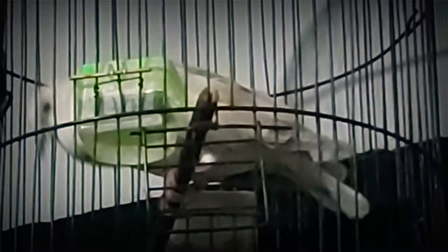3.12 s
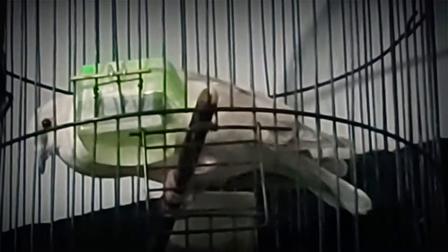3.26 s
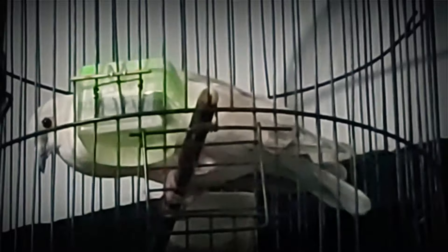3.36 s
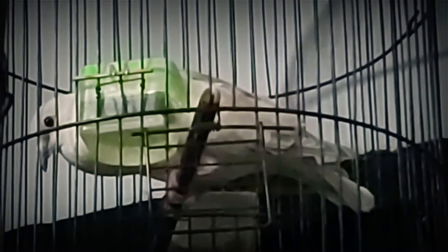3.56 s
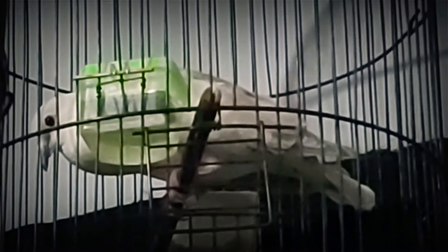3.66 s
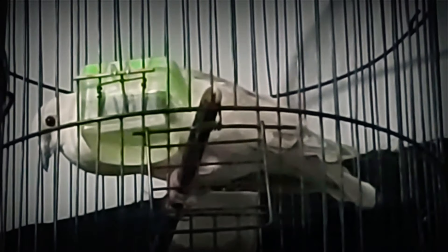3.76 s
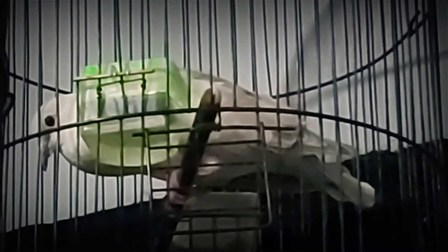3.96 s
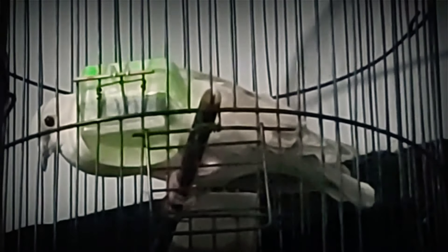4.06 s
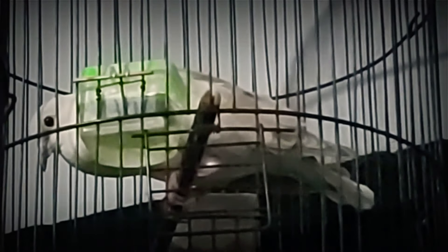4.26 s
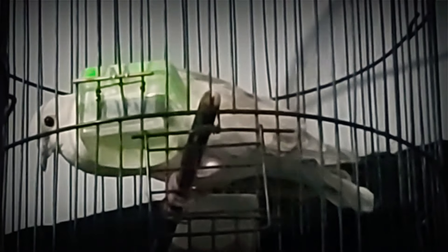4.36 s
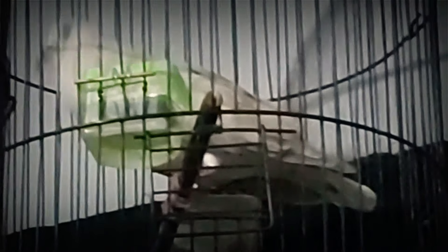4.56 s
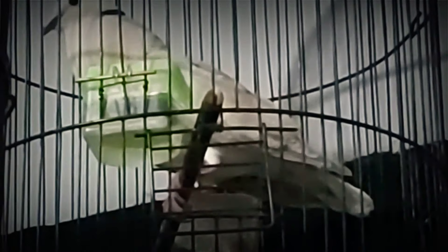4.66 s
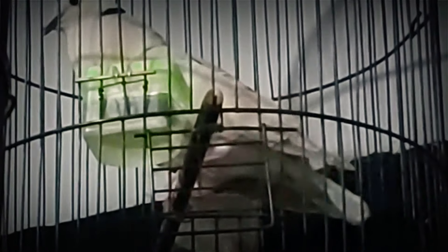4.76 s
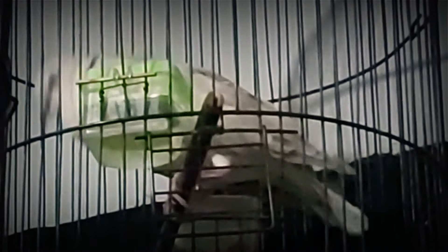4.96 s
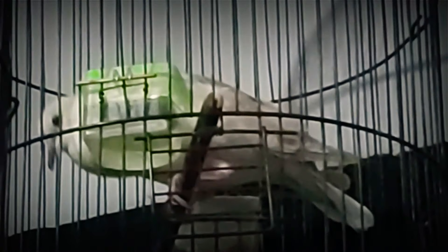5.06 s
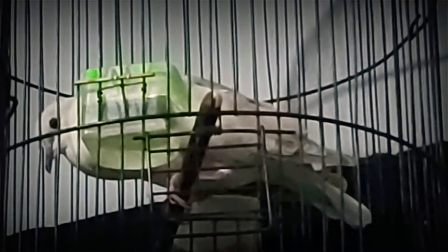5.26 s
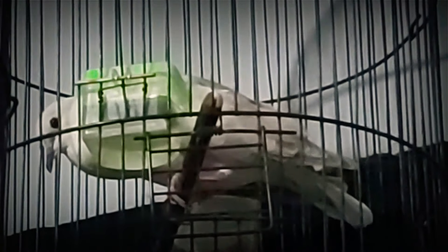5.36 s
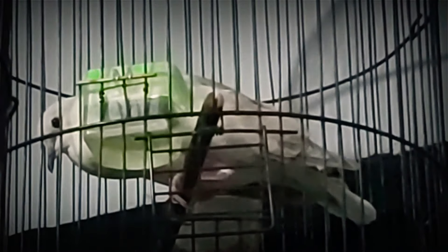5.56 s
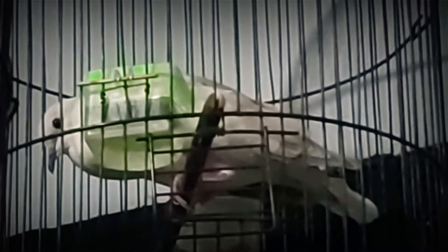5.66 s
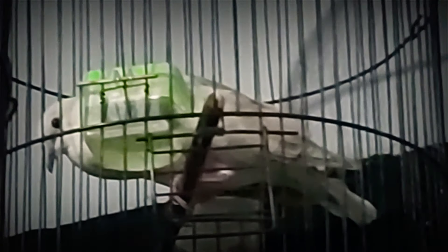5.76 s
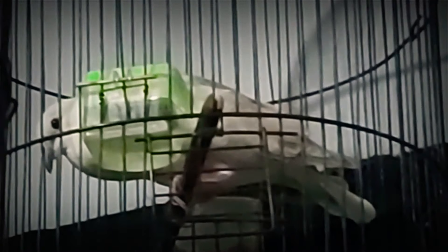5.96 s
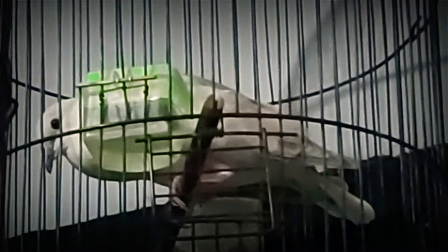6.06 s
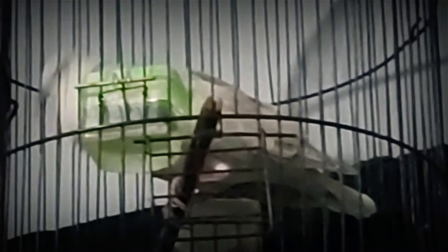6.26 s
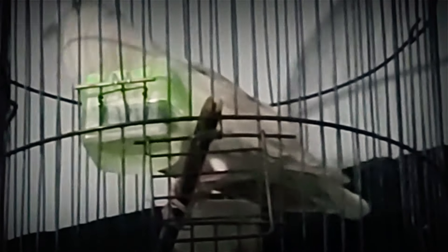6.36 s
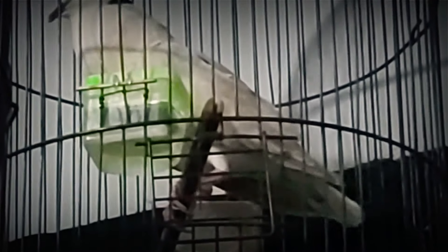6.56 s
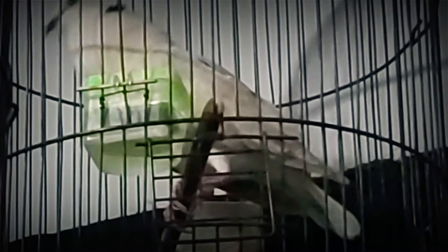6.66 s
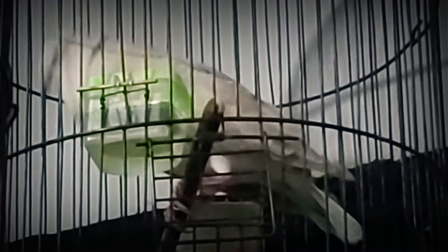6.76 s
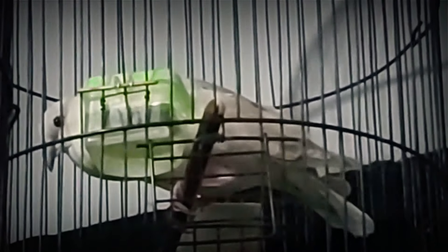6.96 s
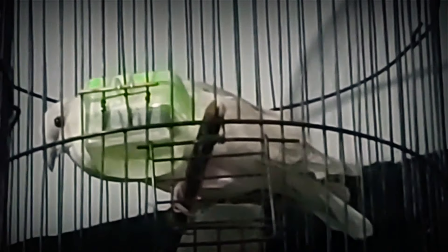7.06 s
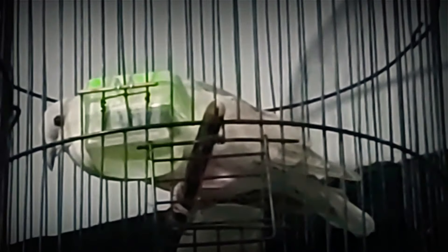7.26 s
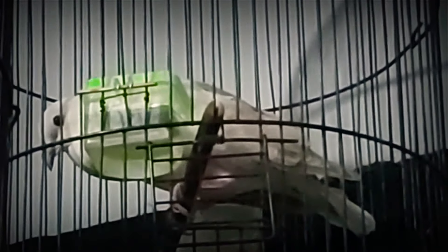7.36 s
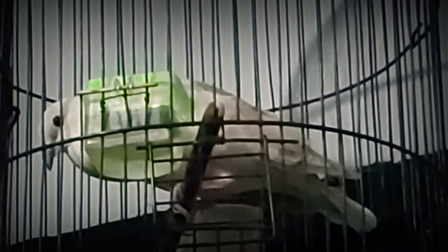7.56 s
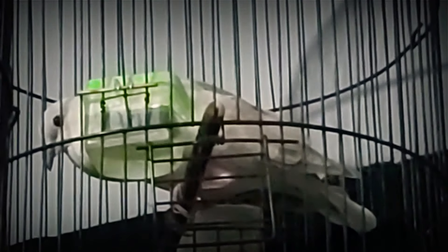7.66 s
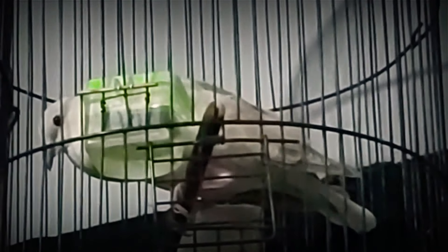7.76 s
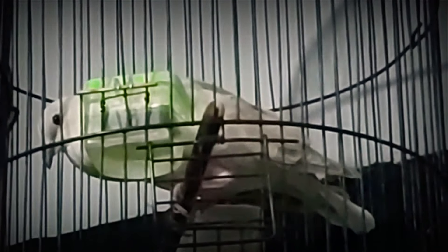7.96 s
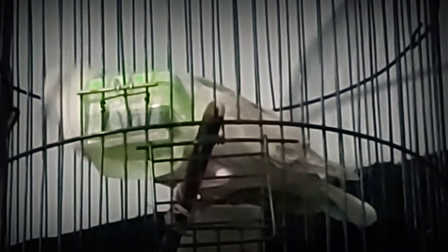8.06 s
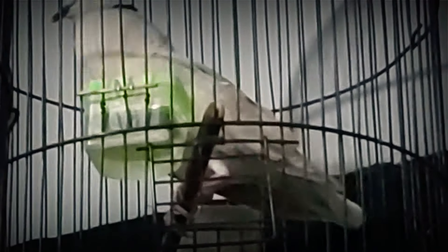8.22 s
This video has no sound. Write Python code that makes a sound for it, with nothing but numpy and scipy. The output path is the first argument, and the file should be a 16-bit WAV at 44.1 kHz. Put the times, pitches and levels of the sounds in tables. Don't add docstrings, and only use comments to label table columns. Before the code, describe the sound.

A caged dove, very close and loud, in a small hard room with short echoes. At 0 s a long coo is already climbing in throbs; it becomes a fluttering, hoarse roll near 520 Hz, swells clear, then breaks at 0.6 s to a lower note that dies in rasp. A wheezy, pulsing breath begins at 1.0 s, its throat resonance rising, leading to a short hoarse coo at 1.3 s. The pattern returns with long coos jumping to full tone around 2.0, 3.9, 5.7 and 7.5 s, and short raspy coos at 3.2, 5.1, 6.9 and 8.7 s. Faint feather and perch rustles come between 4.9 and 6.3 s. A last long coo starts climbing after 9.1 s and is cut off. Beneath lie soft street wash, a wavering distant engine hum that fades and returns, brief low drones and faint 6 kHz insects. Loudest coos overload the stereo microphone.

```python
import sys
import numpy as np
from scipy import signal
from scipy.fft import rfft, irfft
from scipy.io import wavfile
from scipy.ndimage import uniform_filter1d, minimum_filter1d

SR = 44100
rng = np.random.default_rng(int(sys.argv[2]) if len(sys.argv) > 2 else 0)


def invert_db(x):
    u = np.asarray(x, float) / 20
    return 10 ** u


def unload_audio(sound):
    columns = np.transpose(np.atleast_2d(sound))
    steps = np.round(np.clip(columns, -1, 1) * 32767)
    wavfile.write(sys.argv[1], SR, steps.astype(np.int16))


N = 410571


def evened(x):
    return x / np.sqrt(np.mean(x ** 2) + 1e-20)


def read(points, hz):
    f, value = np.transpose(points)
    return np.interp(np.log(hz + 1), np.log(f + 1), value)


def along(rows):
    s, *columns = np.transpose(rows)
    t = np.arange(round(s[0] * SR), min(round(s[-1] * SR), N)) / SR
    return t, *(np.interp(t, s, c) for c in columns)


def add(mix, t, sound):
    mix[..., round(t[0] * SR):][..., :len(t)] += sound


def bandpass(x, band):
    return signal.sosfilt(signal.butter(3, band, "band", fs=SR, output="sos"), x)


def wander(hz, size):
    smoother = signal.butter(2, hz, fs=SR, output="sos")
    return evened(signal.sosfilt(smoother, rng.standard_normal(size)))


def coloured(x, points):
    hz = np.fft.rfftfreq(x.shape[-1], 1 / SR)
    return evened(irfft(rfft(x) * invert_db(read(points, hz)), x.shape[-1]))


def resonate(x, hz, width):
    turn = np.exp(2j * np.pi * np.cumsum(hz * np.ones(x.shape[-1])) / SR)
    r = np.exp(-np.pi * width / SR)
    return 2 * (turn * signal.lfilter([1 - r], [1, -r], x / turn)).real


# frequency_hz, density_db_per_hz
RASP_SPECTRUM = [(120, -67), (200, -37), (300, -19), (390, -11), (450, -5), (520, 0), (680, -10),
                 (800, -21), (955, -38), (1250, -39), (1780, -39), (2300, -49), (3000, -66), (5000, -100)]


def rasp(size):
    flaps = np.cumsum(75 * (1 + .3 * wander(30, size))) / SR % 1
    return coloured(np.exp(-flaps / 0.88) * rng.standard_normal(size), RASP_SPECTRUM)


# multiple, level_db
OVERTONES = [(2, -38.5), (3, -62.5), (4, -47)]


def tone(hz, clean):
    phase = 2 * np.pi * np.cumsum(hz) / SR
    overtones = sum(invert_db(db) * np.sin(k * phase) for k, db in OVERTONES)
    return np.sin(phase + 0.28) + clean * overtones


# jump_s (to full tone), break_s, low_ending_hold_s, throb_spacing_s (at the jump), last_swell_s
LONG_COOS = [
    (.046, 0.6, 0.27, .066, .09),
    (1.986, 2.54, .125, .065, .125),
    (3.852, 4.418, .12, .068, .115),
    (5.749, 6.266, .06, .068, .075),
    (7.527, 8.055, .075, .064, .075),
    (9.428, 9.96, .1, 0.059, .1),
]
# from_break_s, top_db, pitch_hz, rasp_db (under the tone),
# low_voice_share (0-1), throb_depth_db, flutter_depth_db
ROLL = [
    (-.85, -28, 505, -20, .6, 14, 5),
    (-.7, -11, 505, -25, .85, 12, 4),
    (-.6, -3.5, 505, -26, .9, 12, 4),
    (-.55, -3.5, 505, -26, 1, 14, 4),
    (-.54, -3.5, 512, -22, .17, 12, 8),
    (-.39, -6.5, 518, -17, .25, 4, 15),
    (-.3, -9.5, 536, -9, .1, 0, 15),
    (-.16, -11, 545, -17, .05, 0, 8),
    (-.078, -10.5, 548, -33, .01, 0, 2),
]
ENDING = [
    (-.045, -.8, 538, -42, 0, 0, 0),
    (-.018, -1.5, 530, -42, 0, 0, 0),
    (.002, -24, 495, -40, 0, 0, 0),
    (.024, -2, 475, -38, 0, 0, 0),
    (.04, -17, 466, -36, 0, 0, 3),
    (.058, -8, 458, -35, 0, 0, 4),
    (.11, -8.5, 443, -32, 0, 0, 2),
    (.14, -17, 405, -19, .25, 0, 10),
    (.25, -27, 400, -10, .6, 0, 9),
]
# time_s, peak_db
PUSHES = [(.103, -4), (.152, -4), (.203, -5), (.229, 1), (.35, -8), (.399, -6), (.429, -3.5), (1.999, 1),
          (2.078, -5), (2.133, -4.5), (2.172, 1), (2.276, -7), (2.317, -5.5), (2.365, -4.5), (3.868, 1.5),
          (3.916, -2), (4.001, -3), (4.075, -6), (4.114, -5.5), (4.196, -6), (5.763, -3), (5.844, 1.5),
          (5.898, -4), (5.95, -6), (7.535, -2), (7.608, 1.5), (7.651, -5.5), (7.714, -7), (7.754, -7),
          (7.843, -6)]
# multiple, level_db
HALF_LINES = [(.5, -36), (1.5, -32), (2, -45), (3, -50)]


def long_coo(jump, at, held, spacing, swell):
    first_throb_s, growth, rise = -.305, 1.1, .08
    jump_s, swell_s, bounce_s, held_s = -.54, -.1, .04, .11
    begin = max(jump + first_throb_s, 0)
    end = at + held + ENDING[-1][0] - held_s
    t = np.arange(round(begin * SR), min(round(end * SR), N)) / SR
    since = np.interp(t, [jump - 1, jump, at - swell, at, at + bounce_s, at + held, at + held + 1],
                      [jump_s - 1, jump_s, swell_s, 0, bounce_s, held_s, held_s + 1])
    u, *tune = np.transpose(ROLL + ENDING)
    top_db, hz, rasp_db, low, throb_db, flutter_db = (np.interp(since, u, c) for c in tune)

    beat = np.log1p((t - jump) * (growth - 1) / spacing) / np.log(growth) % 1
    falling = ((beat - rise) / (1 - rise)) ** 2 * (beat > rise)
    sag = np.maximum(1 - beat / rise, falling)
    flaps = np.cumsum(40 * np.exp(.35 * wander(15, len(t)))) / SR
    flutter = 1 - np.abs(np.cos(np.pi * flaps)) ** 0.6 + .2 * wander(25, len(t))
    level_db = top_db - throb_db * sag - flutter_db * flutter
    for s, db in PUSHES:
        level_db = np.maximum(level_db, db - 6 * ((t - s) / .011) ** 2)
    level_db = uniform_filter1d(uniform_filter1d(level_db, size=90), size=90)

    push_db = level_db - uniform_filter1d(level_db, size=2000)
    shaky = hz + invert_db(rasp_db) * (90 * wander(27, len(t)) + 12 * push_db)
    clean = np.clip((520 - hz) / 60, .12, 1) * np.clip(-rasp_db / 30, 0, 1)
    clean *= invert_db(4 * wander(8, len(t)) - 3)
    second = tone(458.3 + 16 * wander(20, len(t)), 0.64)
    low = np.clip(low, 0, 1)
    high_share, low_share = np.sqrt(1 - low), np.sqrt(low)
    voice = high_share * tone(shaky, clean) + low_share * second
    voice /= (high_share + low_share) ** 0.53
    phase = 2 * np.pi * np.cumsum(shaky) / SR
    half_lines = sum(invert_db(db) * np.sin(k * phase) for k, db in HALF_LINES)
    voice += np.exp(-((since + .14) / .07) ** 2) * half_lines

    breath_db = level_db - .4 * push_db + rasp_db
    sound = invert_db(level_db) * voice + invert_db(breath_db) * rasp(len(t))
    fade_in = np.clip((t - jump - first_throb_s) / .01, 0, 1)
    return t, sound * np.minimum((t[-1] - t) / 0.028, 1) * fade_in


# frequency_hz, t60_s
ROOM = [(200, 0.55), (500, 0.4), (2000, 0.21), (8000, 0.067)]


def room(x):
    taps = np.zeros((2, SR // 2))
    at = np.arange(200, SR // 2 - 20, 20) + rng.integers(0, 20, (2, (SR // 2 - 201) // 20))
    np.put_along_axis(taps, at, rng.choice([-1., 1.], at.shape), 1)
    hz, t, z = signal.stft(taps, SR, nperseg=256)
    decay = invert_db(-60 * t / read(ROOM, hz)[:, None])
    tail = signal.istft(z * decay, SR, nperseg=256)[1]
    return signal.fftconvolve(x[None], tail / np.linalg.norm(tail[0]), axes=1)[:, :N]


# frequency_hz, density_db_per_hz
FLOOR = [(15, -62.5), (45, -38.5), (90, -10), (350, -5.5), (520, -3.5), (700, -17.5), (900, -21.5),
         (1520, -23), (1890, -32.5), (2280, -25.5), (2600, -36.5), (5200, -46), (9400, -48.5), (13000, -47),
         (15300, -49.5)]
# frequency_hz, coherence
SAME = [(60, 0.92), (300, 1), (900, 0.043), (15000, .02)]
# frequency_hz, left_minus_right_db
LEAN = [(40, -18), (150, -6), (500, 7), (1500, -11), (6000, -11.5), (13000, 1.5)]


def floor():
    frames, hz = N // 256 + 5, np.fft.rfftfreq(1024, 1 / SR)
    a, b, c, d, patches = rng.standard_normal((frames, 513, 5)).T
    patches = evened(uniform_filter1d(uniform_filter1d(patches, 8, 0), 14, 1))
    same = np.clip(read(SAME, hz), -1, 1)[:, None]
    lean = read(LEAN, hz)[:, None] / 2
    left = a + 1j * b
    right = same * left + np.sqrt(1 - same ** 2) * (c + 1j * d)
    z = np.array([left * invert_db(lean), right * invert_db(-lean)])
    z *= invert_db(read(FLOOR, hz)[:, None] + 2.2 * patches)
    return invert_db(-43.5) * evened(signal.istft(z, nperseg=1024, noverlap=768)[1][:, :N])


# time_s, level_db
HUM = [(0.0, -40), (1.06, -48), (2.2, -49), (2.8, -57.5), (5.4, -61), (5.94, -52.5), (7.62, -47.5),
       (9.31, -52)]
# start_s, length_s, level_db, pitch_hz
DRONES = [
    (.0, 0.17, -36.5, 119),
    (1.963, 0.19, -38.5, 119),
    (3.95, 0.21, -38, 119),
    (6.422, 0.15, -45, 115),
    (7.914, 0.37, -57, 118),
    (8.427, 0.14, -45, 114),
]


def engine():
    t, level_db = along(HUM)
    out = np.zeros(N)
    hum_db = level_db + 1.1 * wander(16, len(t))
    hum_hz = 65 + 1.4 * wander(3.4, len(t))
    add(out, t, invert_db(hum_db) * np.sin(2 * np.pi * np.cumsum(hum_hz) / SR))
    rumble = coloured(rng.standard_normal(len(t)), [(25, -24), (58, 0.5), (95, -1.5), (130, -32.5)])
    add(out, t, invert_db(level_db - 14) * rumble)
    for s, length, db, hz in DRONES:
        t = np.arange(round(s * SR), round((s + length) * SR)) / SR
        add(out, t, invert_db(db) * np.sin(2 * np.pi * hz * t) * signal.windows.tukey(len(t), .4))
    return out * invert_db(np.array([[-2.2], [2.2]]))


# time_s, level_db
INSECTS = [(0, -56.5), (2.4, -57), (6.2, -57), (6.6, -59), (7.7, -55.5), (8.4, -59.5), (9.31, -56.5)]
# from_hz, to_hz
CHOIRS = [(5750, 6850), (7450, 8300)]
# from_s, to_s, pitch_hz, level_db
TRILLS = [
    (.36, 1.03, 8296, -72),
    (.12, 1.03, 11057, -79),
    (0, 9.31, 6390, -73),
    (0, 2.5, 7547, -80),
    (6.7, 9.31, 7775, -80),
]


def insects():
    t, low_db = along(INSECTS)
    high_db = -66.5 + 1.8 * (low_db - low_db.mean())
    low, high = (evened(bandpass(rng.standard_normal((2, len(t))), band)) for band in CHOIRS)
    beat = 2 * np.pi * 8.3 * t + 1.7
    throb_db = 1.8 * np.cos(beat) + 1.2 * np.cos(2 * beat) + 1.1 * np.cos(4 * beat)
    choir = invert_db(low_db + throb_db) * low + invert_db(high_db) * high
    for start, end, hz, db in TRILLS:
        trill = evened(resonate(rng.standard_normal(low.shape), hz, 10))
        choir += invert_db(db) * trill * ((t > start) & (t < end))
    out = np.zeros((2, N))
    add(out, t, choir * invert_db(np.array([[-1.4], [1.4]])))
    return out


# start_s, opening_db, top_db, first_pulse_hz, last_pulse_hz
GASPS = [
    (1.0, -20.5, -28.5, 222.8, 238),
    (2.8, -39, -26.5, 209.9, 238),
    (4.66, -32, -25, 208.1, 175.9),
    (6.48, -37, -29, 194.2, 180.3),
    (8.28, -34, -30, 189.2, 173),
]


def gasp(start, open_db, top_db, first_hz, last_hz, end):
    t = np.arange(round(start * SR), round(end * SR)) / SR
    done = (t - start) / (end - start)
    effort_db = np.interp(done, [0, .6, 1], [open_db, top_db, top_db - 3]) + 2.2 * wander(9, len(t))
    hz = first_hz + (last_hz - first_hz) * done + 4.0 * wander(5, len(t))
    throat_hz = 456 + (709 - 456) * done
    rough = 0.056 + (0.61 - 0.056) * done ** 2 + .004 * max(first_hz - 200, 0)
    turns = np.cumsum(hz * (1 + 0.0094 * wander(25.0, len(t)))) / SR
    pulses = sum(np.cos(2 * np.pi * k * turns) for k in range(1, 6))
    drive = (1 - rough) * evened(pulses) + rough * 7.6 * rng.standard_normal(len(t))
    rising = resonate(resonate(drive, 1.066 * throat_hz, 160), 1.074 * throat_hz, 140)
    fixed = resonate(resonate(drive, 410, 200), 410, 200)
    throat = bandpass(rising + 0.51 * fixed, [300, 800])
    throat += 0.029 * np.cos(2 * np.pi * turns)
    fade = np.minimum((t - t[0]) / .05, 1) * signal.windows.tukey(len(t), .05)
    return t, invert_db(effort_db - 2.5) * evened(throat) * fade


# start_s, hold_s, effort_db
COOS = [
    (1.322, .2, -16),
    (3.163, 0.2, -16),
    (5.062, .21, -16.5),
    (6.882, .22, -16.5),
    (8.73, .2, -16),
]


def coo(start, hold, effort_db):
    attack_s, sag_db, fall_db_per_s, fall_s = .014, -3, 150, .2
    t = np.arange(round(start * SR), round((start + hold + fall_s) * SR)) / SR
    done = np.clip((t - start) / hold, 0, 1)
    hz = 485 + (528.7 - 485) * done
    rough = np.clip(.45 + (1.05 - .45) * done, 0, 1)
    level_db = effort_db + sag_db * done - fall_db_per_s * np.maximum(t - start - hold, 0)
    flutter = 1 + .8 * np.cos(2 * np.pi * np.cumsum(80 + 30 * wander(20, len(t))) / SR)
    fluttering = tone(hz * (1 + .03 * wander(34.0, len(t))), 0.22) * flutter
    voice = np.sqrt(1 - rough ** 2) * evened(fluttering) + rough * rasp(len(t))
    fade = np.minimum((t - t[0]) / attack_s, 1) * signal.windows.tukey(len(t), .02)
    return t, invert_db(level_db) * voice * fade


# start_s, hold_s, level_db
RUSTLE = [
    (4.861, .1, -65.5),
    (4.976, .015, -59),
    (5.116, .16, -62.5),
    (5.301, .3, -71),
    (5.604, 0.68, -66.5),
]
# frequency_hz, density_db_per_hz
RUSTLE_COLOUR = [(1500, -30), (3000, -5), (5000, -5), (7500, 0), (10000, -6), (12800, -7), (13400, 2),
                 (14200, -5), (15300, -14)]


def rustle():
    t = np.arange(N) / SR
    grains = rng.standard_normal((2, N)) * invert_db(3.5 * wander(60, N))
    level = np.zeros(N)
    for s, hold, db in RUSTLE:
        attack = np.clip((t - s) / (.2 * hold), 0, 1)
        level += attack * invert_db(db - 150 * np.maximum(t - s - hold, 0))
    return invert_db(5.5) * level * coloured(grains, RUSTLE_COLOUR)


# frequency_hz, width_hz, level_db
ROOM_MODES = [(446.2, 8, -14), (512.4, 42, -15), (528.8, 24, -11)]


def scene():
    dove = np.zeros(N)
    for row in LONG_COOS:
        add(dove, *long_coo(*row))
    for short, intake in zip(COOS, GASPS):
        add(dove, *gasp(*intake, end=short[0]))
        add(dove, *coo(*short))
    dove += sum(invert_db(db) * resonate(dove, hz, width) for hz, width, db in ROOM_MODES)
    front, walls = room(dove)
    direct = dove * invert_db(np.array([[-.3], [-2.1]]))
    near = direct + invert_db(-20) * front + invert_db(-15) * walls * np.array([[1], [-1]])
    return near + floor() + engine() + insects() + rustle()


def low_pass(x):
    return signal.sosfilt(signal.butter(12, 15480, fs=SR, output="sos"), x)


def record(dry):
    lag_s = .0018
    reach = uniform_filter1d(-minimum_filter1d(-abs(dry).max(0), size=441), size=441)
    held = dry / np.maximum(np.roll(reach, round(lag_s * SR)) / 1.02, 1)
    mix = np.clip(held, -1, 1)
    return low_pass(mix)


dry = scene()
out = record(dry)
unload_audio(out)
```